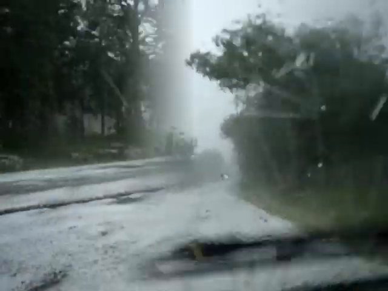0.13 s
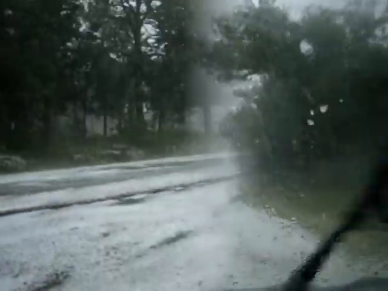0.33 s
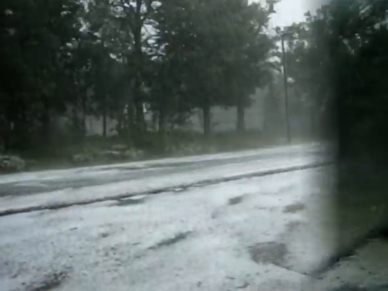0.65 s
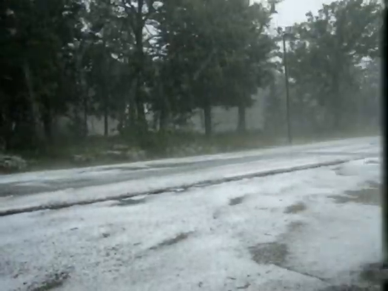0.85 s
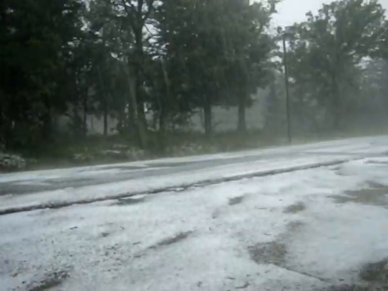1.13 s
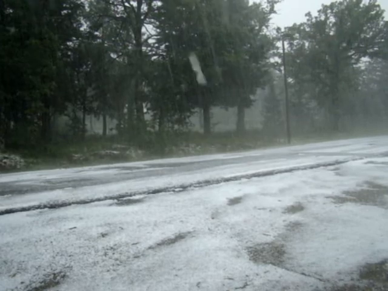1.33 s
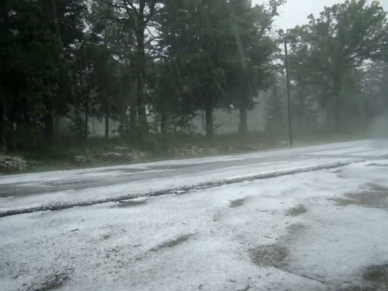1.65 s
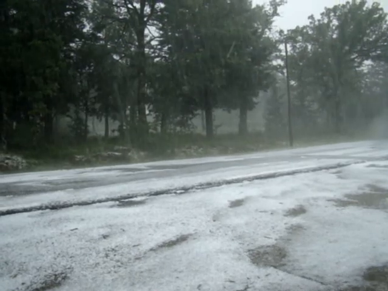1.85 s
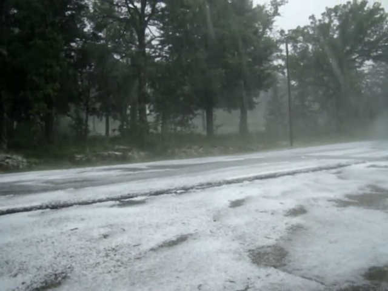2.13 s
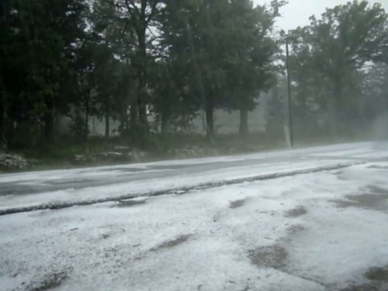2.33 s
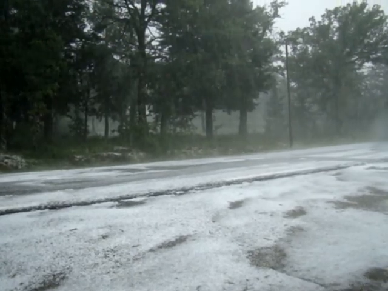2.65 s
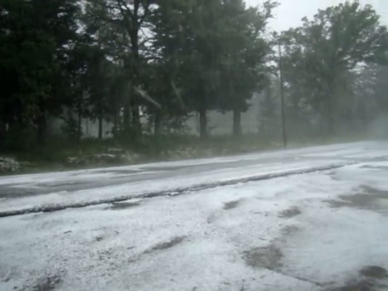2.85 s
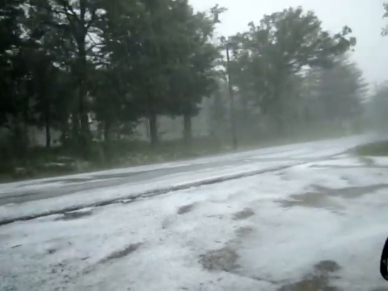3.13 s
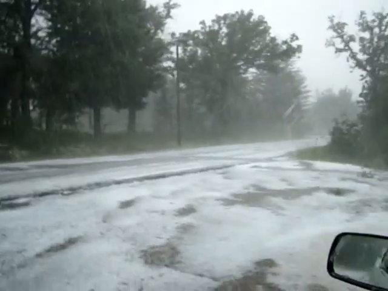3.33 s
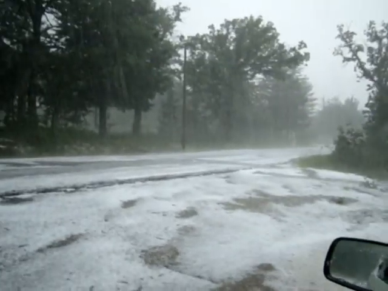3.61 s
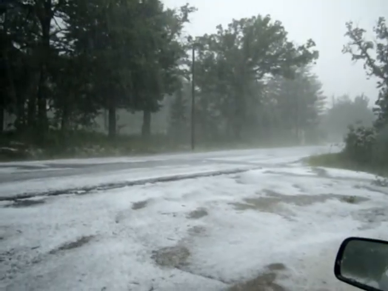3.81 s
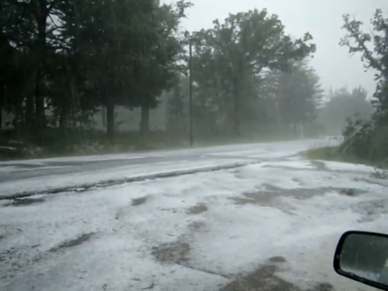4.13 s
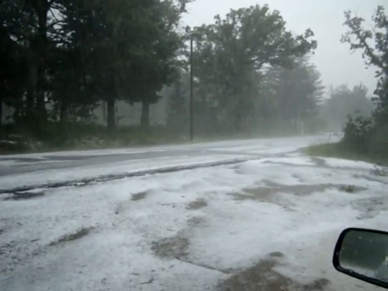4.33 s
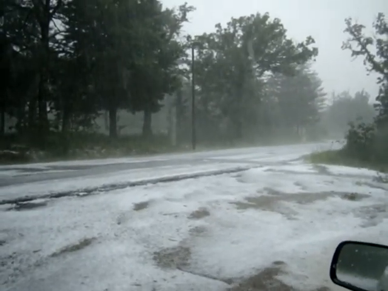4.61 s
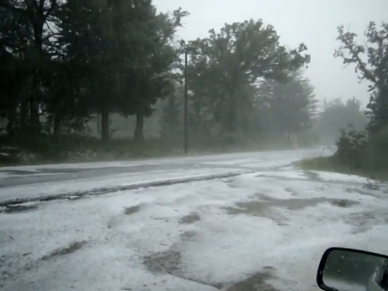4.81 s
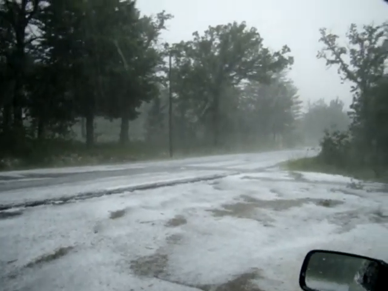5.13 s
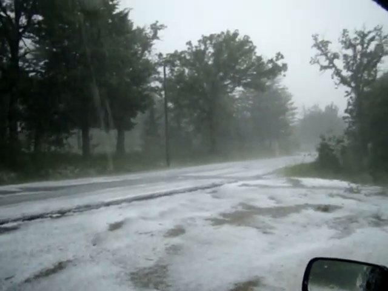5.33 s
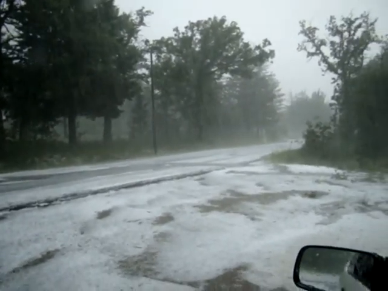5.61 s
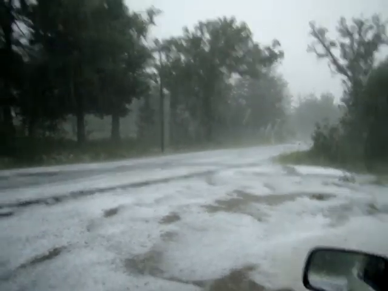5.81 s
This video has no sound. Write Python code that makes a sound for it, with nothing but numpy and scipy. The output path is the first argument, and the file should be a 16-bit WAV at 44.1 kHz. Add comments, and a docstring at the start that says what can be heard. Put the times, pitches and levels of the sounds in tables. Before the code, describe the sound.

A continuous crackling wash of hail and rain surrounds a car. Countless tiny ticks merge into a harsh hiss with drumming on the bodywork. Over it, several times a second, single stones knock with short damped rings and brief rattles, and dry cracks pop very close. After a dull first moment the sound opens up and stays intense to the end. Little deep bass, limited treble, small close microphone.

```python
"""Hail and heavy rain on a parked car

Stones and drops beat on the car, heard by a small microphone at the open side window. One scene, duller
and a little quieter, fades into a second. Single stones are damped rings with a noise rattle, near ticks
are brief damped cosines, and the far wash is noise of varying strength. Snaps of fixed polarity are
mostly followed by a brief dip in the level of everything but the snaps."""
import sys
import numpy as np
from scipy import signal
from scipy.io import wavfile
from scipy.ndimage import uniform_filter1d

SR = 44100
rng = np.random.default_rng(int(sys.argv[2]) if len(sys.argv) > 2 else 0)


def wrap_up_sound(samples):
    """Save the sound to the file named by the first command line argument, as 16-bit audio."""
    columns = np.atleast_2d(samples).T
    # keep every value between -1 and 1, then stretch to whole-number steps
    tamed = np.clip(columns, -1, 1)
    steps = np.round(tamed * 32767).astype(np.int16)
    wavfile.write(sys.argv[1], SR, steps)


N = 263277  # length [samples]


def gain_of(db):
    """Logarithmic levels: converts decibels to an amplitude ratio."""
    return 10 ** (np.asarray(db) / 20)


def evened(x):
    """Normalisation: scales a signal or spectrum to an rms of 1."""
    return x / np.sqrt(np.mean(abs(x) ** 2) + 1e-20)


def read(points, hz):
    """Interpolation: reads a spectrum along a logarithmic frequency axis."""
    f, value = np.transpose(points)
    return np.interp(np.log(hz + 1), np.log(f + 1), value)


def add(mix, s, sound):
    """Superposition: adds a sound to the mix, starting at second s."""
    part = mix[round(s * SR):][:len(sound)]
    part += sound[:len(part)]


# The loudest stones: (time [s], blow level [dB], ring frequency [Hz], initial rattle level [dB])
LOUD_STONES = [(0.2815, -20, 1490, -31), (0.2892, -17, 2270, -15.5), (0.3153, -17, 3359, -34),
               (0.334, -7, 3875, -23), (0.6288, -20, 1140, -24), (0.779, -23, 4565, -19),
               (0.9126, -16, 2411, -25), (1.0217, -12.5, 5857, -16.5), (1.1544, -17, 1378, -16.5),
               (1.197, -11, 4134, -30.5), (1.264, -13.5, 8950, -16), (1.385, -25, 3570, -16.5),
               (1.56, -6.5, 4330, -30), (1.5699, -8, 5370, -26), (1.6433, -12, 5300, -15.5),
               (1.7914, -11, 4909, -21), (1.8204, -11, 4220, -22), (1.845, -14, 4500, -21),
               (1.979, -16, 5684, -15.5), (2.0796, -16, 3703, -18), (2.141, -10, 5000, -21),
               (2.1646, -7.5, 4750, -21), (2.2627, -16, 5167, -18), (2.3052, -15, 4651, -23),
               (2.3202, -15, 1110, -27), (2.435, -16, 4220, -14.5), (2.513, -17, 1440, -24),
               (2.6145, -12, 1464, -17), (2.7536, -10, 3962, -17), (2.8068, -11, 4392, -25),
               (2.8643, -9.5, 4565, -28.1), (2.8812, -12, 3617, -18), (2.9618, -21, 4048, -18),
               (3.0213, -10.5, 4048, -17), (3.1034, -21, 3617, -20), (3.152, -10, 6976, -19),
               (3.2325, -15, 4450, -16), (3.2442, -16, 4392, -23), (3.3151, -17.5, 1378, -20),
               (3.3923, -5, 4600, -24.5), (3.4602, -17.5, 5167, -29), (3.4912, -19, 4160, -16.5),
               (3.646, -23, 4134, -15), (3.6874, -23, 4134, -21.5), (3.8529, -26, 4909, -43),
               (4.0142, -14, 3186, -19), (4.0789, -25, 1130, -20.5), (4.2179, -18, 6976, -22),
               (4.3, -22, 4730, -16), (4.585, -4, 4909, -21), (4.859, -13, 3875, -20),
               (4.8797, -14, 3600, -20), (4.906, -11, 3875, -30), (4.964, -28, 947, -18.5),
               (5.0568, -13, 4100, -24), (5.3056, -12.8, 4306, -26), (5.3666, -5, 5512, -18),
               (5.3882, -11.0, 4220, -33), (5.4155, -24, 4048, -25), (5.5297, -7, 4250, -24),
               (5.5527, -12.2, 1464, -29), (5.602, -9, 5684, -19), (5.6905, -16, 1270, -20),
               (5.8815, -11, 4560, -18), (5.909, -19, 3900, -26)]
BLOW_RISE_S, RATTLE_T60_S = 0.0003, 0.068  # time for the blow to peak; time for the rattle to fall 60 dB


def stones():
    """Damped resonance: each blow excites a short ring, and a rattle of like colour decays in the cabin."""
    out = np.zeros(N)
    t = np.arange(3000) / SR
    rows = small_stones() + list(LOUD_STONES)
    noises = rng.standard_normal((len(rows), len(t)))
    for (s, blow_db, hz, rattle_db), noise in zip(rows, noises):
        band = signal.butter(1, [hz / 1.58, min(hz * 1.72, SR / 3)], "bandpass", fs=SR)
        rattle = evened(signal.lfilter(*band, noise))
        rattle *= gain_of(rattle_db - 60 * t / RATTLE_T60_S)
        rattle *= 1 - np.exp(-t / 0.00082)  # soft onset
        envelope = t / BLOW_RISE_S * np.exp(1 - t / BLOW_RISE_S)
        blow = envelope * np.cos(2 * np.pi * hz * (t - BLOW_RISE_S))
        add(out, s, rattle - gain_of(blow_db) * blow)
    return signal.sosfilt(signal.butter(3, 300, "highpass", fs=SR, output="sos"), out)


# mean levels and their standard deviation [dB]
SMALL_BLOW_DB, SMALL_RATTLE_DB, SMALL_SPREAD_DB = -20, -29, 4.5
PANEL_RING_HZ, GLASS_RING_HZ = 1470, 4500  # median pitches
ON_PANEL_SHARE, RING_SPREAD = .3, 0.091  # chance of striking a panel; deviation of log frequency


def small_stones(count=45):
    """Random impact: smaller stones strike panel or glass, as rows like LOUD_STONES."""
    when, place = rng.random((count, 2)).T
    blow, rattle, pitch = rng.standard_normal((count, 3)).T
    hz = np.where(place < ON_PANEL_SHARE, PANEL_RING_HZ, GLASS_RING_HZ)
    hz = hz * np.exp(RING_SPREAD * pitch)
    blow_db = SMALL_BLOW_DB + SMALL_SPREAD_DB * blow
    rattle_db = SMALL_RATTLE_DB + SMALL_SPREAD_DB * rattle
    return list(zip(when * N / SR, blow_db, hz, rattle_db))


# Snaps: (time [s], crack peak [dB], depth setting of the dip [dB], thud peak below THUD_HZ [dB])
SNAP_EVENTS = [(0.2004, -9.2, 4, -58), (0.8463, -15.2, 4, -61), (1.0337, -8, 1.5, -53),
               (1.1626, -11.9, 1.5, -49), (1.2957, -3, 9, -49.5), (1.3941, -12.3, 3.5, -62),
               (1.5054, -12.5, 3, -49.5), (1.5845, -10, 1.5, -56), (1.6131, -19, 5.5, -53),
               (1.7066, -8.3, 3, -56), (1.8968, -17, 4, -62), (2.0065, -4.5, 11, -45.5),
               (2.1907, -14, 2.5, -53.5), (2.3759, -13, 3.5, -62), (2.4804, -11, 9, -48),
               (2.548, -9.2, 2.5, -53.5), (2.8882, -11.1, 10.5, -48.5), (3.006, -10.7, 7, -59),
               (3.2986, -7.0, 4.5, -58), (3.3929, -9.5, 1.5, -55), (3.4231, -11.0, 7, -56.5),
               (3.703, -16.1, 4, -52), (3.8532, -9.2, 5.5, -53), (4.099, -14.7, 4.5, -56.5),
               (4.6303, -10.6, 6.5, -48.5), (4.6644, -7.0, 8, -47.5), (4.9212, -12, 6.5, -53),
               (5.1178, -8.1, 5.5, -50.5), (5.3663, -1.5, 0, -56), (5.5387, -14.1, 0, -53)]
THUDS_DB, THUDS_PER_S = -61.5, 32  # random thuds: reference level before scatter; mean rate
THUD_S, THUD_HZ = 0.00031, 100  # half-width at 1/e; top of the bass band
DIP_HOLD_S, DIP_SLOW_S, DIP_SLOW_SHARE = 0.016, 0.017, 0.12  # fast and lingering recovery; lingering share


def snaps():
    """Impulsive pressure: cracks and thuds of one polarity, returned with the level dip after the cracks."""
    cracks, dip_db = np.zeros(N), np.zeros(N)
    t = np.arange(8000) / SR
    thud_gains = gain_of(THUDS_DB + rng.uniform(-8, 6, N))
    thuds = thud_gains * (rng.random(N) < THUDS_PER_S / SR)
    # the level falls within a millisecond, holds, and climbs back
    back = (1 - DIP_SLOW_SHARE) * np.exp(-(t / DIP_HOLD_S) ** 2) + DIP_SLOW_SHARE * np.exp(-t / DIP_SLOW_S)
    dip_shape = (1 - np.exp(-t / 0.00023)) * back
    for s, crack_db, depth_db, thud_db in SNAP_EVENTS:
        add(cracks, s, gain_of([crack_db]))
        add(thuds, s, gain_of([thud_db]))
        add(dip_db, s, depth_db * dip_shape)
    u = np.arange(-300, 301) / SR
    crack = (1 - 2 * (u / .00008) ** 2) * np.exp(-(u / .00008) ** 2)
    thud = np.exp(-(u / THUD_S) ** 2)
    thud *= SR / (2 * THUD_HZ * thud.sum())  # its part below THUD_HZ peaks at 1
    snap = -signal.oaconvolve(cracks, crack, "same") - signal.oaconvolve(thuds, thud, "same")
    return snap, gain_of(-dip_db)


TICKS_DB, TICKS_PER_S, TICK_SPREAD_DB = 0, 3000, 3  # level; mean rate; scale of the random excess


def ticks(count=24):
    """Modal ringing: near stones each ring a small patch of metal or glass; the cabin adds a short tail."""
    excess_db = TICK_SPREAD_DB * np.minimum(rng.exponential(1, N), 4)
    size = gain_of(excess_db) * (rng.random(N) < TICKS_PER_S / SR)
    patch = rng.integers(0, count, N)
    t = np.arange(600) / SR
    out = np.zeros(N)
    for k, hz in enumerate(np.linspace(300, 10200, count)):
        ring = -np.cos(2 * np.pi * hz * t) * np.exp(-t / 0.00052)
        ring *= gain_of(-.4 * hz / 1000)  # weaker in the treble
        out += signal.oaconvolve(size * (patch == k), ring)[:N]
    # the tail is fresh noise whose power follows each blow and falls 60 dB in 9.5 ms
    decay = gain_of(-120 * np.arange(4000) / SR / 0.0095)
    tail_power = signal.oaconvolve(size ** 2, decay)[:N]
    tail = evened(np.sqrt(abs(tail_power)) * rng.standard_normal(N))
    return evened(evened(out) + gain_of(2.0) * tail)


WASH_DB = -2  # level beside the ticks


def wash():
    """Incoherent sum: far stones and drops merge into noise with drifting patches and fading strength steps."""
    frames = N // 64 + 5
    a, b, patches = rng.standard_normal((frames, 129, 3)).T
    patches = uniform_filter1d(patches, size=8, axis=0)  # across frequency
    patches = evened(uniform_filter1d(patches, size=20, axis=1))  # along time
    volleys = rng.uniform(-1.17, 1, frames) ** 3
    flicker = signal.lfilter([1], [1, -.88], volleys)  # each step sets in sharply and fades
    strength_db = 2.2 * patches + 2.93 * evened(flicker - flicker.mean())
    z = (a + 1j * b) * gain_of(strength_db)
    return evened(signal.istft(z, nperseg=256, noverlap=192)[1][:N])


# Strength of the downpour: (time [s], relative level [dB], panel drumming against the hiss [dB])
STORM_STRENGTH = [(0.0, -23, -1), (0.08, -27, -4.5), (0.29, -25, 0.7), (0.38, -26, -3.5), (0.88, -24.5, -1),
                  (0.93, -20, -1.5), (1.0, -23, -0.5), (1.26, -23, -2.5), (1.45, -23.5, -1.5),
                  (1.83, -23, -2), (1.92, -24, -0.5), (2.14, -22.5, -1.5), (2.21, -25.5, -3.5),
                  (2.3, -22, -0.5), (2.86, -22.5, -2), (2.94, -25, -1.5), (3.25, -22.5, -2.5),
                  (3.87, -23, -0.5), (4.3, -22, -1.5), (4.6, -20, -3.5), (4.79, -26, 0), (4.85, -22.5, -2),
                  (5.72, -22, -0.5), (5.82, -23.5, -1.5), (5.97, -21.5, -0.5)]
# Spectral shape of the downpour in each scene: (frequency [Hz], relative density [dB per Hz])
FIRST_COLOUR = [(20, -51), (90, -31), (140, -25), (266, -17.5), (524, -8), (981, -4), (1800, -5),
                (3260, -3), (5220, -8), (10300, -10)]
SECOND_COLOUR = [(20, -53.5), (95, -48.5), (140, -21), (246, -15.5), (300, -9), (600, -3.5), (1310, 0),
                 (2200, -4.5), (2800, -4.5), (4020, -.5), (5950, -3), (10300, -4.5)]
# Fade from the first scene to the second: (start [s], end [s])
SCENE_FADE = (0.067, 0.75)
PANEL_HZ, PANEL_OCTAVES = 1170, 1.35  # centre of the drumming; half-width at 1/e


def coloured(x):
    """Spectral filtering: shapes the downpour by scene colour, panel drumming and changing strength."""
    hz, t, z = signal.stft(x, SR, nperseg=1024, noverlap=768)
    s, level_db, drum_db = np.transpose(STORM_STRENGTH)
    first = evened(gain_of(read(FIRST_COLOUR, hz))[:, None])
    second = evened(gain_of(read(SECOND_COLOUR, hz))[:, None])
    share = np.interp(t, SCENE_FADE, [0, 1])
    colour = np.sqrt((1 - share) * first ** 2 + share * second ** 2)  # fade in power
    panel = np.exp(-(np.log2((hz + 1) / PANEL_HZ) / PANEL_OCTAVES) ** 2)[:, None]
    drumming = gain_of(panel * np.interp(t, s, drum_db))
    y = signal.istft(z * colour * drumming, SR, nperseg=1024, noverlap=768)[1]
    return y[:N] * gain_of(np.interp(np.arange(N) / SR, s, level_db))


def scene():
    """Superposition: downpour and stones share the dips, and the snaps are added undipped."""
    downpour = coloured(gain_of(WASH_DB) * wash() + gain_of(TICKS_DB) * ticks())
    snap, dip = snaps()
    return ((downpour + stones()) * dip + snap)[None]


EDGE_HZ = 10150  # upper band limit


def record(dry):
    """Saturation and band limiting: the input stage rounds off peaks, then cuts the bass and the top treble."""
    rounded = np.tanh(dry)
    bass_cut = signal.sosfilt(signal.butter(1, 25, "highpass", fs=SR, output="sos"), rounded)
    lowpass = signal.firwin(511, EDGE_HZ, window=("kaiser", 9), fs=SR)[None]
    return signal.oaconvolve(bass_cut, lowpass, "same")


dry = scene()
out = record(dry)
wrap_up_sound(out)
```